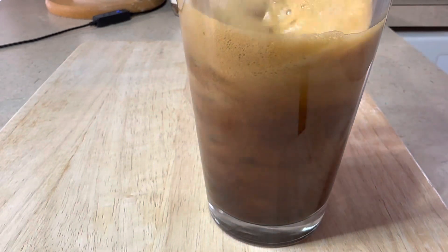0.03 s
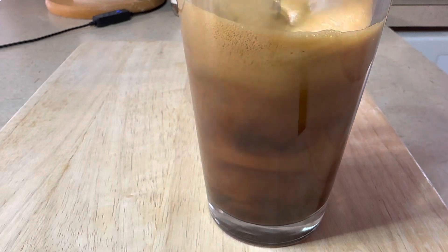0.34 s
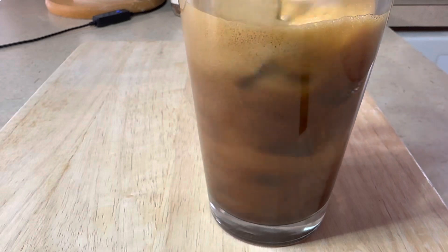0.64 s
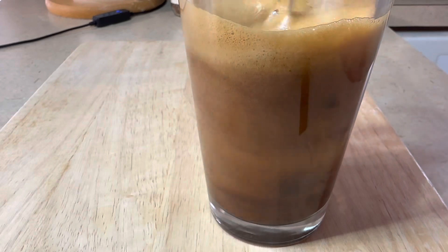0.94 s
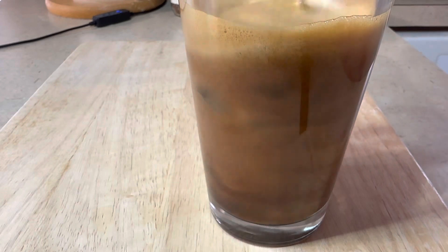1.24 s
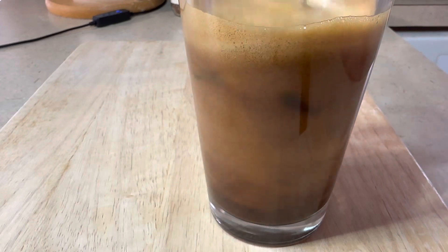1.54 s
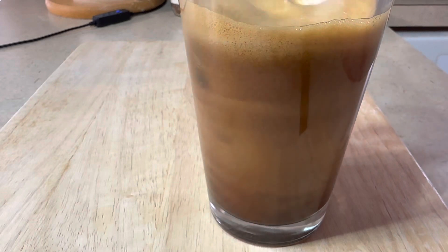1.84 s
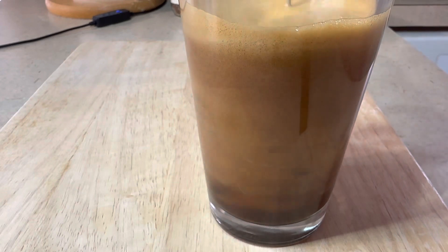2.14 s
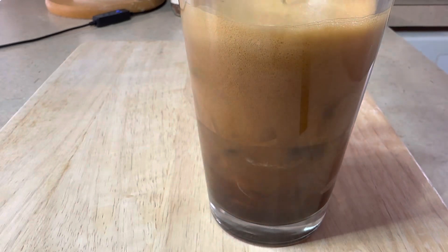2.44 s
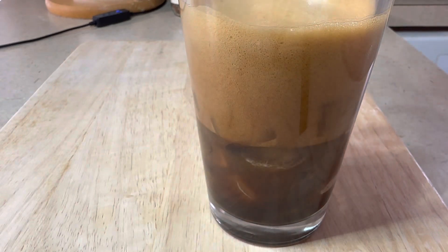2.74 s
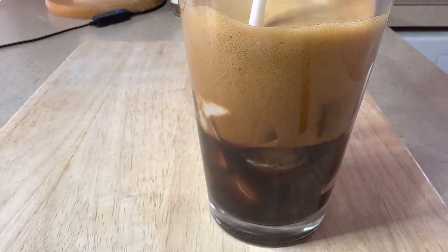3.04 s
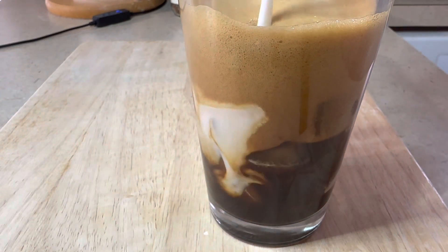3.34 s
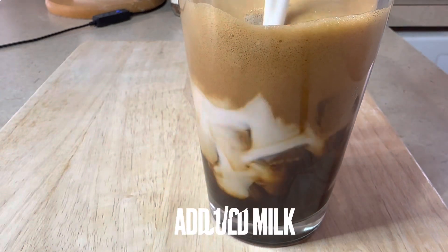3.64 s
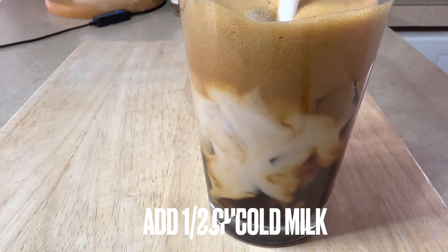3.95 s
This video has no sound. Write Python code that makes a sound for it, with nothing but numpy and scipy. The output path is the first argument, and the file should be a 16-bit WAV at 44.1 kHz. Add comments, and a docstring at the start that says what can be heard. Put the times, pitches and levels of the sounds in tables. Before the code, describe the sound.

Close up in a small kitchen, iced coffee churns in a glass with clattering cubes and low bubbling gulps. It settles, an object is set down with a knock, then poured milk slops quietly with a faint fizz.

```python
"""Coffee churns and ice rattles in a glass on a wooden board, close up, whirled by a handheld frother.
Colliding cubes thud in the drink, grind together and ring the glass; trapped air gulps and bubbles.
The whirl dies away from about 2.3 s. Something is put down with a knock that rings the worktop.
Milk is poured in: slops, plops, ticks of shifting ice and a fizz of foam. A small kitchen answers."""
import sys
import numpy as np
from scipy import signal
from scipy.fft import rfft, irfft, next_fast_len
from scipy.io import wavfile

SR = 44100
rng = np.random.default_rng(int(sys.argv[2]) if len(sys.argv) > 2 else 0)


def persist_wave(psi):
    """Save psi, clipped to +-1, as 16-bit WAV."""
    counts = np.round(np.clip(psi, -1, 1) * 32767).astype(np.int16)
    wavfile.write(sys.argv[1], SR, np.atleast_2d(counts).T)


N = 176400
TOP_HZ = 15830  # band limit

# spectrum of liquid and board: freq_hz, gain_db
CHURN_SPECTRUM = [(25, -15), (45, -20.5), (62, -0.5), (95, 1.5), (130, -1), (190, -2.5), (250, 3),
                  (300, -2), (360, -0.5), (450, -2.5), (520, -8.5), (600, -7), (660, -27), (740, -3.5),
                  (830, -12), (920, -22.5), (1100, -8.5), (1600, -27), (2050, -6), (2700, -29),
                  (4400, -75.5)]
# colour of the bright grinding rattle, with a gap cut at 11-12 kHz: freq_hz, gain_db
GRIND_SPECTRUM = [(300, -42.5), (900, 0), (1600, -2), (2450, 2), (2900, 0), (3900, -7.5), (4600, 0.5),
                  (5300, -7), (5820, 1.5), (6300, -1), (6900, 3.5), (7800, -8.5), (8500, -5.5),
                  (9800, -8.5), (11000, -41.5), (12200, -49.5), (13600, -13.5), (15500, -28.5)]
# filled glass: freq_hz, gain_db, t60_s, stereo_phase_rad
GLASS_MODES = [(2024, -5.5, .08, .9), (4412, -16, .09, .5), (5825, 4, .015, .7), (6930, -2, .008, .7),
               (8435, -1, .024, .6), (10920, -17, .03, 2.7), (11380, -21, .035, 2.8),
               (11650, -17, .025, 2.7), (12820, -10, .012, .9), (14200, -12, .007, .9)]


def amp(db):
    """Decibels to gain."""
    return 10 ** (np.asarray(db) / 20)


def decay(t, t60):
    """Exponential fall, 60 dB down at t60."""
    return np.exp(-np.log(1000) * t / t60)


def unit(x):
    """x at rms 1."""
    return x / np.sqrt(np.mean(x ** 2) + 1e-20)


def along(points, hz):
    """Interpolate (freq_hz, value) points on a log axis."""
    freq_hz, values = np.transpose(points)
    return np.interp(np.log(hz + 1), np.log(freq_hz + 1), values)


def filtered(x, response):
    """Zero-phase filter of gain response(hz)."""
    size = next_fast_len(N + SR // 2)
    return irfft(rfft(x, size) * response(np.fft.rfftfreq(size, 1 / SR)), size)[..., :N]


def coloured(x, spectrum, size=8192):
    """Minimum-phase filter of unit energy."""
    cepstrum = irfft(np.log(amp(along(spectrum, np.fft.rfftfreq(size, 1 / SR)))))
    cepstrum[1:size // 2] *= 2
    cepstrum[size // 2 + 1:] = 0
    impulse = irfft(np.exp(rfft(cepstrum)))
    return signal.fftconvolve(x, impulse[None] / np.linalg.norm(impulse), axes=1)[:, :N]


def noise(width=None):
    """White stereo noise; by default narrow in the bass, wider in the treble."""
    # stereo width of the direct sound: freq_hz, side_minus_mid_db
    direct_width = [(60, -23.5), (92, -27.5), (140, -16.5), (210, -24.5), (330, -23.5), (500, -8),
                    (770, -3), (1170, -9.5), (1790, -2.5), (2740, 1), (4190, -5.5), (6410, -2),
                    (9810, -4.5), (15000, -3.5)]

    def mid_side_gains(hz):
        angle = np.arctan(amp(along(width or direct_width, hz)))
        return np.array([np.cos(angle), np.sin(angle)])

    mid, side = filtered(rng.standard_normal((2, N)), mid_side_gains)
    return np.array([mid + side, mid - side])


def impulses(start_s, sizes):
    """One impulse per contact."""
    return np.bincount(np.clip(np.round(start_s * SR).astype(int), 0, N), sizes, N + 1)[:N]


def bursts(start_s, sizes, t60_s, rise_s=0.0018):
    """One puff of noise per contact, swelling briefly and dying."""
    power = signal.lfilter([1], [1, -amp(-120 / (t60_s * SR))], impulses(start_s, sizes ** 2))
    lag = np.exp(-1 / (rise_s * SR))
    return np.sqrt(np.abs(signal.lfilter([1 - lag], [1, -lag], power))) * noise()


def ring(modes, start_s, sizes, vary_db, tilt_db_oct=0, pivot_hz=1000, rise_s=0.00022):
    """Each contact rings the modes in a random mix; the liquid cushions the onset."""
    out = np.zeros((2, N))
    lag = np.exp(-1 / (rise_s * SR))
    for hz, gain_db, t60_s, phase_rad in modes:
        polarity, spread = rng.standard_normal((len(start_s), 2)).T
        mode_db = gain_db + vary_db * spread + tilt_db_oct * np.log2(hz / pivot_hz)
        force = impulses(start_s, sizes * np.sign(polarity) * amp(mode_db))
        pole = np.exp((2j * np.pi * hz - np.log(1000) / t60_s) / SR)
        mode = signal.lfilter([1 - lag], np.poly([pole, pole * lag]), force)
        out += np.imag(mode * np.exp(1j * phase_rad * np.array([[.5], [-.5]])))
    return out


def struck(modes, t, tilt_db_oct, pivot_hz):
    """Modes ringing after one blow."""
    out, ears = np.zeros((2, len(t))), np.array([[.5], [-.5]])
    for hz, gain_db, t60_s, phase_rad in modes:
        gain = amp(gain_db + tilt_db_oct * np.log2(hz / pivot_hz))
        out += gain * decay(t, t60_s) * np.sin(2 * np.pi * hz * t + ears * phase_rad)
    return out


def room_tone(level_db=-65):
    """Faint, steady rumble."""
    # room tone: freq_hz, gain_db
    spectrum = [(25, -7), (65, 10.5), (130, 6), (220, -1), (400, -8.5), (800, -20), (2000, -21),
                (4000, -31), (8500, -32), (11000, -55), (15000, -42)]
    return amp(level_db) * coloured(noise(), spectrum)


def kitchen(direct):
    """Reverberation, 5 ms late; each frequency dies at its own rate."""
    # room decay: freq_hz, t60_s
    decay_times = [(100, 0.29), (800, 0.53), (2000, 0.29), (2600, 0.39), (5500, 0.067), (8000, 0.11),
                   (15000, 0.14)]
    # wall reflections: freq_hz, gain_db
    walls = [(100, -14), (800, -13), (2500, -14), (8000, -16.5), (14000, -28)]
    # stereo width of the tail: freq_hz, side_minus_mid_db
    tail_width = [(100, -16.5), (280, -15), (500, 3), (1000, 0.5), (4000, -2), (12000, -15.5)]
    hz, t, bands = signal.stft(noise(tail_width)[:, :SR // 2], SR, nperseg=256)
    bands = bands * decay(t, along(decay_times, hz)[:, None])
    tail = signal.istft(bands, SR, nperseg=256)[1]
    tail = np.pad(tail / np.linalg.norm(tail[0]), ((0, 0), (SR // 200, 0)))
    wet = signal.fftconvolve(direct, tail, axes=1)[:, :N]
    return filtered(wet, lambda hz: amp(along(walls, hz)))


def fizz(start_s=3.6, level_db=-60.5):
    """Milk tears through the foam: a thin, fading hiss."""
    # colour of the hiss: freq_hz, gain_db
    spectrum = [(1000, -40), (4000, -12), (4900, -4), (5900, 0), (7000, -5), (7900, -7), (8500, 3),
                (9200, -14), (10300, -40), (15000, -50)]
    return coloured(bursts(np.array([start_s]), amp([level_db]), t60_s=.31), spectrum)


def splashes():
    """Dull slops of liquid in the glass."""
    # slops: start_s, level_db, t60_s
    slops = [(0.585, -28, 0.12), (2.546, -49.5, 0.045), (2.969, -52, 0.023), (3.162, -53, 0.053),
             (3.184, -55.5, 0.17), (3.245, -67, 0.051), (3.262, -58, 0.042), (3.533, -58, 0.8),
             (3.578, -51, 0.36), (3.632, -45.5, .035), (3.649, -59, 0.068), (3.71, -43.5, 0.073),
             (3.776, -55, 0.6)]
    # slopping liquid: freq_hz, gain_db
    spectrum = [(60, 0.5), (250, 7), (500, 6), (900, 2), (1400, -6.5), (2100, -9), (3000, -35),
                (5000, -42.5), (8000, -43.5), (15000, -71)]
    t = np.arange(N) / SR
    envelope = sum((t >= start_s) * amp(level_db) * decay(np.abs(t - start_s), t60_s)
                   for start_s, level_db, t60_s in slops)
    return coloured(envelope * noise(), spectrum)


def plops(life_cycles=23, chirp=0.077):
    """Single bubbles ring briefly and rise in pitch."""
    # air in the drink: start_s, level_db, pitch_hz
    air_pockets = [(0.591, -20.5, 1070), (0.596, -26, 1310), (2.97, -48.5, 1240), (3.163, -66, 1090),
                   (3.189, -57, 1460), (3.191, -60.5, 997), (3.246, -52.5, 2100), (3.264, -55, 2070),
                   (3.635, -41, 1220), (3.637, -40, 820), (3.716, -32, 205.5), (3.712, -53.5, 1090),
                   (3.735, -40, 1460)]
    out, t = np.zeros(N + SR), np.arange(SR // 6) / SR
    for start_s, level_db, pitch_hz in air_pockets:
        age = t * pitch_hz / life_cycles
        note = np.sin(2 * np.pi * pitch_hz * t * (1 + chirp * age))
        out[round(start_s * SR):][:len(t)] += amp(level_db) * decay(age, 1) * note
    return out[:N]


def knocks(rim_db=-1, thud_db=1.5, pivot_hz=600):
    """Blunt blows ring the worktop and the glass on it; longer contact, softer onset."""
    # blows: start_s, level_db, tilt_db_oct, contact_s
    hits = [(2.748, -28, 0.5, 0.0027), (2.782, -51.5, -3.5, 0.00068), (2.796, -42.5, -4.5, 0.0036),
            (2.822, -47.5, 0.5, 0.0012), (3.692, -52.5, -6.5, 0.0035), (3.712, -46, -2.5, 0.0016),
            (3.735, -47, 1, 0.0017), (3.917, -59.5, 0, 0.0012)]
    # worktop: freq_hz, gain_db, t60_s, stereo_phase_rad
    worktop_modes = [(88.2, -6, 0.18, .1), (176.3, 3.5, 0.13, .1), (208.3, 3.5, 0.084, .1),
                     (361.3, -12, 0.071, .3), (460, -6.5, 0.099, .5), (590, -0.5, .06, .6),
                     (744, -19, 0.041, .6), (799, 9.5, 0.07, 0.14), (810, -2, 0.036, 0.91),
                     (1038, 3, 0.033, 0.86), (1262, -11.5, 0.095, 1), (1462, -12, 0.089, .7),
                     (2050, 0, 0.032, .9), (2000, -26, 0.3, .9)]
    # glass rim: freq_hz, gain_db, t60_s, stereo_phase_rad
    rim_modes = [(4412, -36, .38, .5), (4455, -40, .34, .5), (3671, -48, .3, .5), (7500, -44, .3, .5),
                 (8400, -46, .18, .5)]
    # dull body of a knock: freq_hz, gain_db
    thud_spectrum = [(60, -2), (150, 6.5), (250, 3.5), (500, 0.5), (950, 0), (1400, -9), (2100, -9),
                     (3000, -29.5), (4600, -27), (5600, -52), (8000, -47.5), (15000, -85)]
    out, t = np.zeros((2, N + SR)), np.arange(SR // 2) / SR
    for start_s, level_db, tilt_db_oct, contact_s in hits:
        worktop = struck(worktop_modes, t, tilt_db_oct, pivot_hz)
        rim = amp(rim_db) * struck(rim_modes, t, tilt_db_oct, pivot_hz)
        onset = 1 - np.exp(-t / contact_s)
        out[:, round(start_s * SR):][:, :len(t)] += amp(level_db) * onset * (worktop + rim)
    start_s, level_db, tilt_db_oct, _ = np.transpose(hits)
    thuds = bursts(start_s, amp(level_db + tilt_db_oct + thud_db), t60_s=0.071)
    return out[:, :N] + coloured(thuds, thud_spectrum)


def ticks(ring_db=-9, crack_db=-1.5, crack_t60_s=0.0045):
    """Drifting cubes touch the calm glass; a slow contact is duller."""
    # settling ice: start_s, level_db, tilt_db_oct, cutoff_hz
    touches = [(2.363, -35.5, 15, 11830), (2.442, -40.5, -0.5, 7360), (2.475, -40.5, 0, 7100),
               (2.49, -56, -10, 8530), (2.547, -62.5, -14, 7030), (2.599, -42, 0, 8180),
               (2.616, -48.5, -5, 6000), (3.246, -71, 12, 9000), (3.461, -61, 5, 9950),
               (3.579, -30, -5.5, 7430), (3.599, -35, 10.5, 8700), (3.734, -66.5, -2, 5000),
               (3.775, -44, -2.5, 7650), (3.813, -42.5, -1, 5080), (3.868, -69, -17, 4000),
               (3.915, -68, 6, 12000)]
    # glass with the drink at rest: freq_hz, gain_db, t60_s, stereo_phase_rad
    calm_modes = [(2030, -4, .055, .9), (4412, -14.5, .11, .5), (5780, -1, .014, .6), (7500, -38, .45, .5),
                  (8435, -3.5, .02, .3), (8500, -33, .28, .3)]
    out, t = np.zeros((2, N + SR)), np.arange(SR // 3) / SR
    for start_s, level_db, tilt_db_oct, cutoff_hz in touches:
        crack = amp(crack_db) * decay(t, crack_t60_s) * rng.standard_normal((2, len(t)))
        hit = crack + amp(ring_db) * struck(calm_modes, t, tilt_db_oct, pivot_hz=5000)
        lowpass = signal.butter(4, min(cutoff_hz, TOP_HZ), fs=SR, output="sos")
        out[:, round(start_s * SR):][:, :len(t)] += amp(level_db) * signal.sosfilt(lowpass, hit)
    return out[:, :N]


def bubbles(count=1300, centre_hz=1332, spread_oct=0.877, spread_db=7.5, life_cycles=16, chirp=0.026):
    """Air whipped into the drink: short rising notes of scattered pitch."""
    start = rng.integers(0, N, (count, 1))
    pitch, size, stereo_phase_rad = rng.standard_normal((3, count, 1))
    samples = np.arange(SR // 40)
    cycles = centre_hz * 2 ** (spread_oct * np.clip(pitch, -2, 2)) * samples / SR
    age = cycles / life_cycles
    envelope = amp(spread_db * np.clip(size, -2, 2)) * decay(age, 1) * (1 - np.exp(-cycles))
    phase = 2 * np.pi * cycles * (1 + chirp * age)
    channels = (envelope * np.sin(phase + ear * stereo_phase_rad) for ear in (.5, -.5))
    return np.array([np.bincount((start + samples).ravel(), notes.ravel(), N)[:N] for notes in channels])


def gulps(note_db=7.5, slosh_db=-11, t60_s=0.055, swell_s=0.009, chirp=0.11):
    """The whirl pulls air under: a low, rising note inside a slosh."""
    # swallowed air: start_s, level_db, pitch_hz
    air_pockets = [(0.281, -23.5, 466), (.374, -25, 336), (0.393, -29.5, 277), (0.437, -21, 248),
                   (.5, -17.5, 295), (0.589, -21.5, 366), (.757, -16.5, 285), (0.831, -30.5, 265),
                   (.928, -22.5, 364), (1.011, -23.5, 248), (1.135, -16.5, 240), (1.174, -26.5, 310),
                   (1.441, -22.5, 345), (1.469, -24.5, 274), (1.611, -31, 266), (1.733, -25, 457),
                   (1.768, -21, 334), (1.831, -23, 226), (2.099, -26, 298)]
    out, t = np.zeros(N + SR), np.arange(SR // 6) / SR
    envelope = (1 - np.exp(-t / swell_s)) * decay(t, t60_s)
    for start_s, level_db, pitch_hz in air_pockets:
        note = np.sin(2 * np.pi * pitch_hz * t * (1 + chirp * t / t60_s))
        out[round(start_s * SR):][:len(t)] += amp(level_db + note_db) * envelope * note
    start_s, level_db, _ = np.transpose(air_pockets)
    slosh = bursts(start_s, amp(level_db + slosh_db), t60_s=0.028)
    return out[:N] + coloured(slosh, CHURN_SPECTRUM)


def clinks(high_db=2.0, low_db=-2, crack_db=-5, split_hz=8000, vary_db=1.5):
    """Cubes flung at the glass; where one lands sets the balance of low and high modes."""
    # hard hits: start_s, level_db, low_mode_offset_db
    hits = [(0.1057,-29.5,0.5), (0.121,-24,4), (0.1507,-23.5,-3.5), (0.1905,-24,-9.5), (0.202,-24,3.5),
            (0.3075,-31,10.5), (0.3571,-34.5,-8), (0.397,-27,3.5), (0.4217,-25.5,-12), (0.4324,-25.5,3),
            (0.4573,-20.5,4), (0.5014,-28,-10), (0.798,-32,-3.5), (1.0227,-18.5,-4), (1.186,-32,-12.5),
            (1.316,-27,-1), (1.3357,-30.5,7.5), (1.388,-34,-5.5), (1.458,-27.5,-14), (1.5923,-23.5,1),
            (1.628,-30,5), (1.724,-17,-3), (1.746,-30,-0.5), (1.821,-22.5,-5.5), (1.86,-20.5,1),
            (1.9246,-20.5,-2.5), (1.955,-27.5,-0.5), (2.0124,-26,-2.5), (2.0991,-26,3.5), (2.135,-29,1.5),
            (2.1555,-23.5,4.5), (2.2513,-21,-19.5)]
    start_s, level_db, offset_db = np.transpose(hits)
    high_modes = [mode for mode in GLASS_MODES if mode[0] > split_hz]
    low_modes = [mode for mode in GLASS_MODES if mode[0] <= split_hz]
    high = ring(high_modes, start_s, amp(level_db + high_db), vary_db)
    low = ring(low_modes, start_s, amp(level_db + offset_db + low_db), vary_db,
               tilt_db_oct=5.3, pivot_hz=6000)
    crack = bursts(start_s, amp(level_db + offset_db / 2 + crack_db), t60_s=0.0084)
    return high + low + coloured(crack, GRIND_SPECTRUM)


def collisions(count, spread_db):
    """Times and sizes of cubes colliding at an uneven pace."""
    start_s = (np.arange(count) + rng.uniform(-1, 2, count)) * N / SR / count
    return np.abs(start_s), amp(spread_db * np.clip(rng.standard_normal(count), -2, 2))


def whirl(churn_db=-0.7, swirl_db=-9, grind_db=-0.9, chatter_db=-4.0, cube_db=-6, foam_db=-9,
          bubble_db=-12):
    """Colliding cubes thud in the liquid, grind, ring and chatter on the glass over hissing foam."""
    # course of the whirl: time_s, liquid_db, ice_db
    levels = [(0, -27.5, -34.5), (.14, -32, -35), (.44, -28.5, -32.5), (0.479, -32.5, -43.5),
              (.505, -31.5, -32), (.68, -30.5, -33), (.77, -31, -33.5), (.95, -33.5, -34.5),
              (1.06, -30, -33.5), (1.25, -31, -34.5), (1.48, -31, -34.5), (1.66, -32.5, -33.5),
              (1.78, -31.5, -35), (1.9, -32.5, -33.5), (2.02, -32.5, -34), (2.14, -35, -36.5),
              (2.294, -39, -34), (2.34, -45, -49), (2.41, -58, -65.5), (2.521, -61, -80.5),
              (2.72, -75, -94.5), (3, -110, -120)]
    # hollow notes of the swirling drink: freq_hz, gain_db, t60_s, stereo_phase_rad
    swirl_modes = [(106, -15, 0.13, .05), (262.4, -6, 0.18, .1), (448.7, 3, 0.054, 0.45),
                   (815, -9, 0.16, 0.37), (1075, -7.5, 0.051, 0.45)]
    # ice cubes: freq_hz, gain_db, t60_s, stereo_phase_rad
    cube_modes = [(2443, 1.5, 0.032, 0.43), (3190, -18.5, 0.024, .6), (3505, -11.5, 0.039, 1)]
    time_s, liquid_db, ice_db = np.transpose(levels)
    t = np.arange(N) / SR
    liquid_gain = amp(np.interp(t, time_s, liquid_db))
    ice_gain = amp(np.interp(t, time_s, ice_db))
    start_s, sizes = collisions(count=1500, spread_db=4.5)
    churn = unit(coloured(bursts(start_s, sizes, t60_s=0.026), CHURN_SPECTRUM))
    swirl = unit(ring(swirl_modes, start_s, sizes, vary_db=2))
    grind = unit(coloured(bursts(start_s, sizes, t60_s=0.011) + amp(foam_db) * noise(), GRIND_SPECTRUM))
    chatter = unit(ring(GLASS_MODES, start_s, sizes, vary_db=7.0))
    cubes = unit(ring(cube_modes, start_s, sizes, vary_db=3))
    liquid = amp(churn_db) * churn + amp(swirl_db) * swirl + amp(bubble_db) * unit(bubbles())
    ice = amp(grind_db) * grind + amp(chatter_db) * chatter
    return liquid_gain * liquid + ice_gain * ice + np.minimum(liquid_gain, ice_gain) * amp(cube_db) * cubes


def scene():
    """The glass just left of centre, the worktop and the room."""
    # stereo balance of the glass: freq_hz, left_minus_right_db
    balance = [(60, -1), (110, 1), (200, 1), (380, -2), (700, -0.5), (1290, 0.5), (2380, 1.5), (4400, 4),
               (8120, 1), (15000, -1.5)]
    glass = whirl() + gulps() + clinks() + ticks() + splashes() + fizz() + plops()
    panned = filtered(glass, lambda hz: amp(along(balance, hz) * np.array([[.5], [-.5]])))
    direct = panned + knocks()
    return direct + kitchen(direct) + room_tone()


def record(dry):
    """The microphone rolls off below 42 Hz and keeps nothing above its band limit."""
    highpass = signal.butter(3, 42, "high", fs=SR, output="sos")
    return filtered(signal.sosfilt(highpass, dry), lambda hz: hz < TOP_HZ)


dry = scene()
out = record(dry)
persist_wave(out)
```